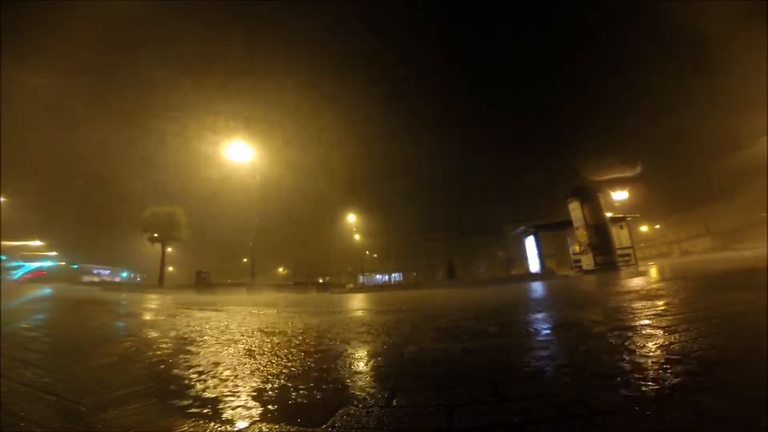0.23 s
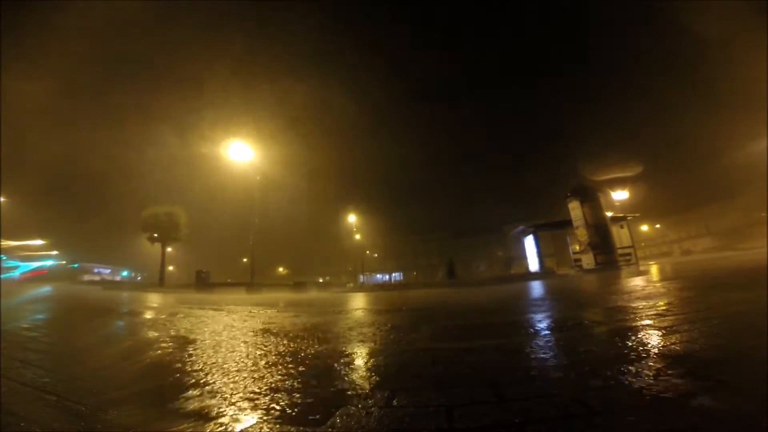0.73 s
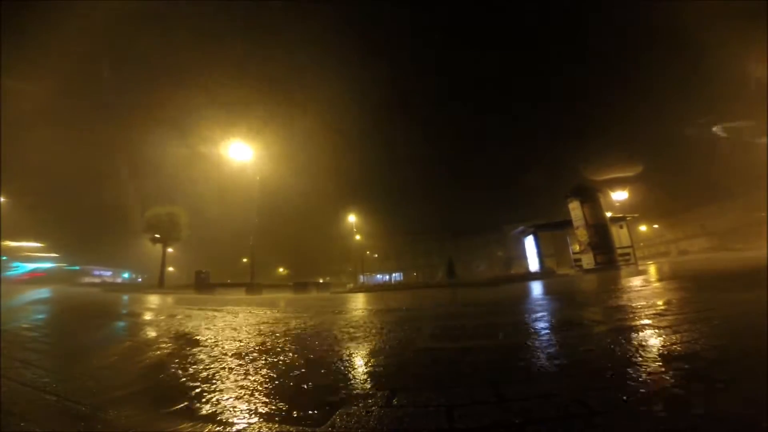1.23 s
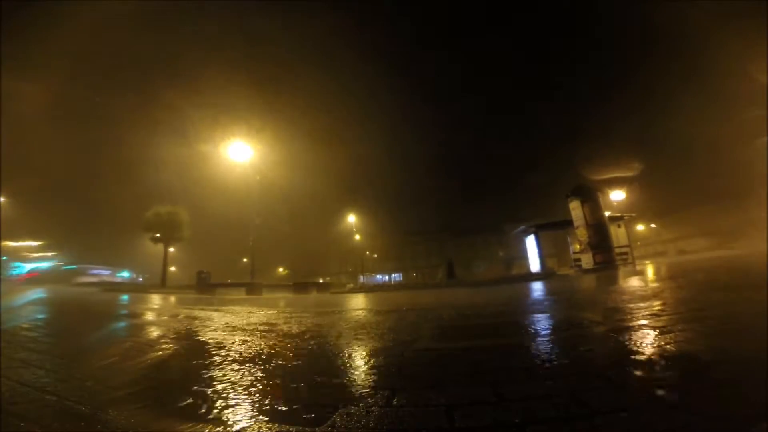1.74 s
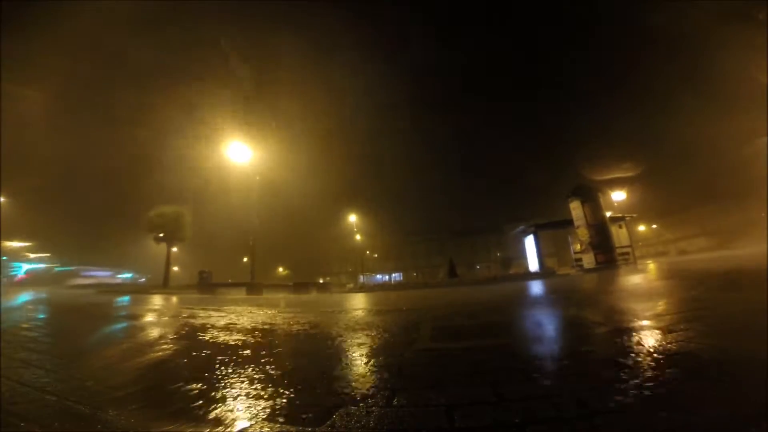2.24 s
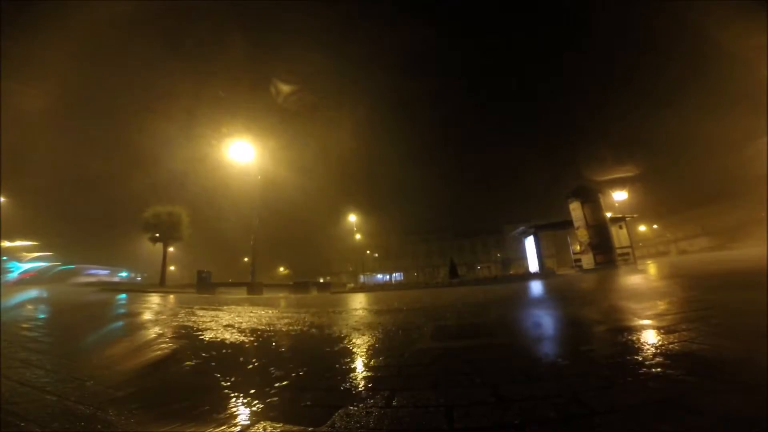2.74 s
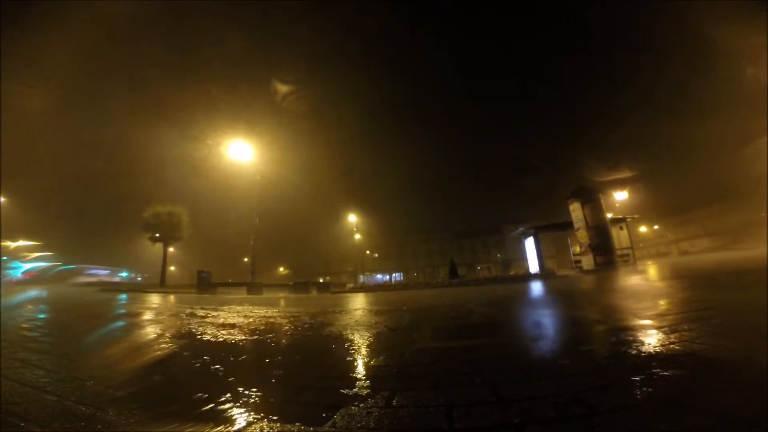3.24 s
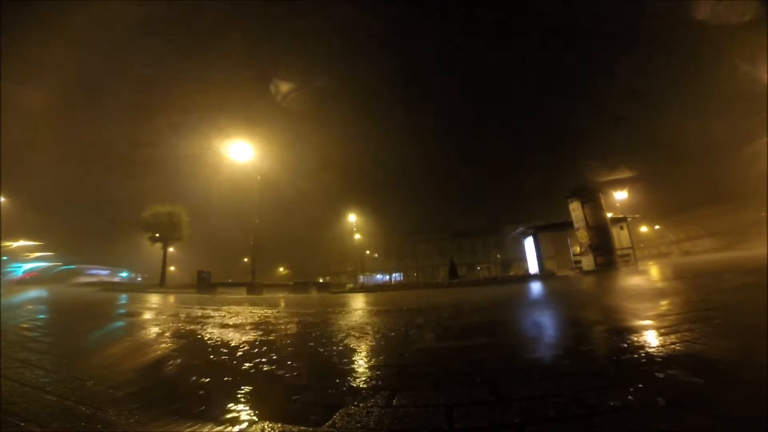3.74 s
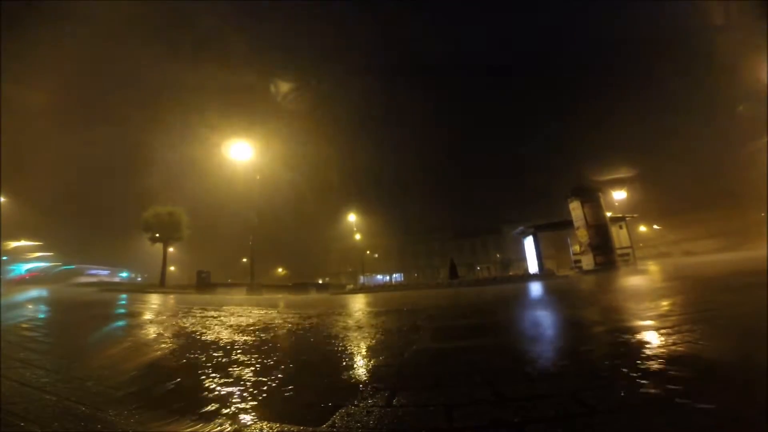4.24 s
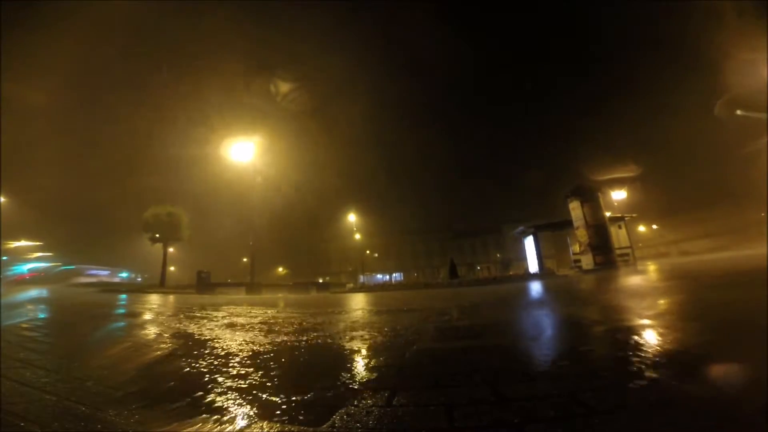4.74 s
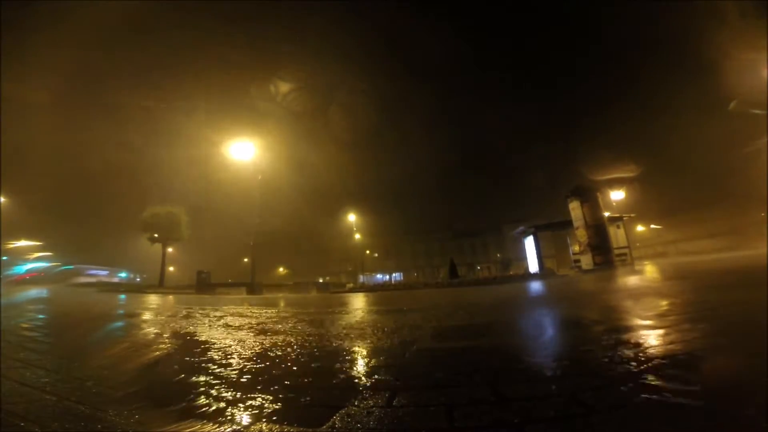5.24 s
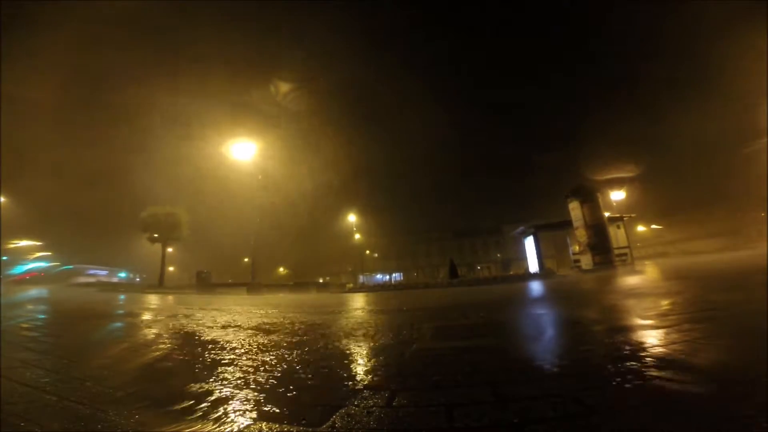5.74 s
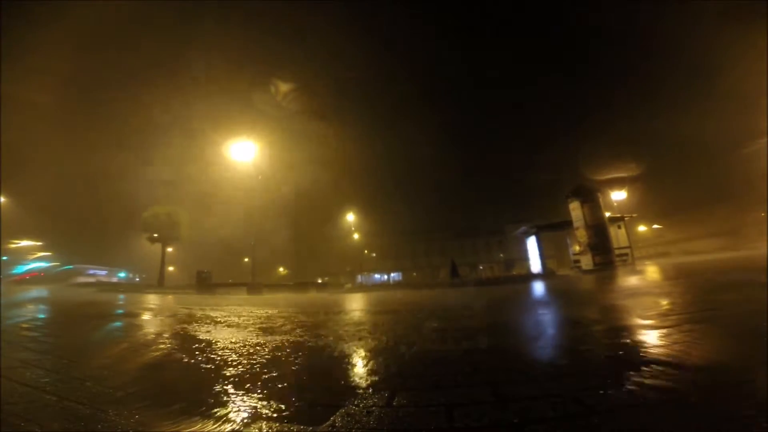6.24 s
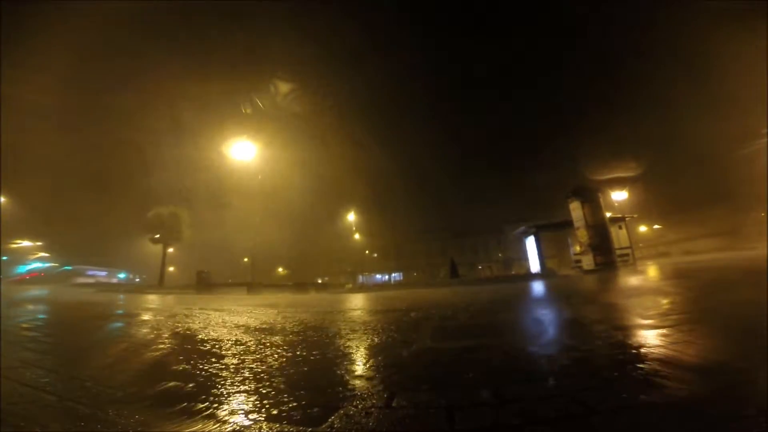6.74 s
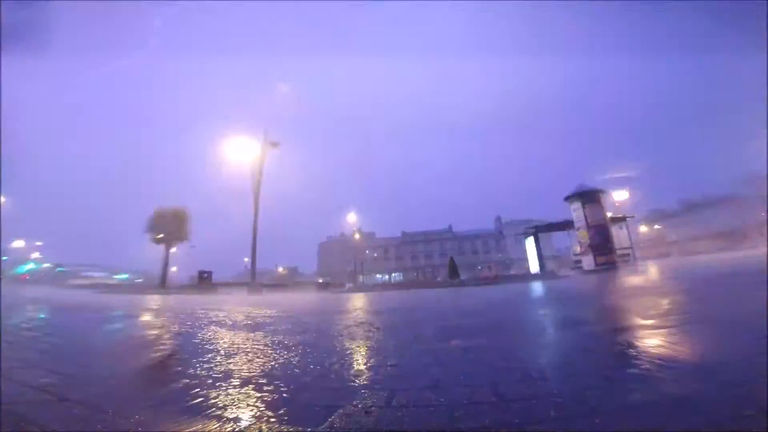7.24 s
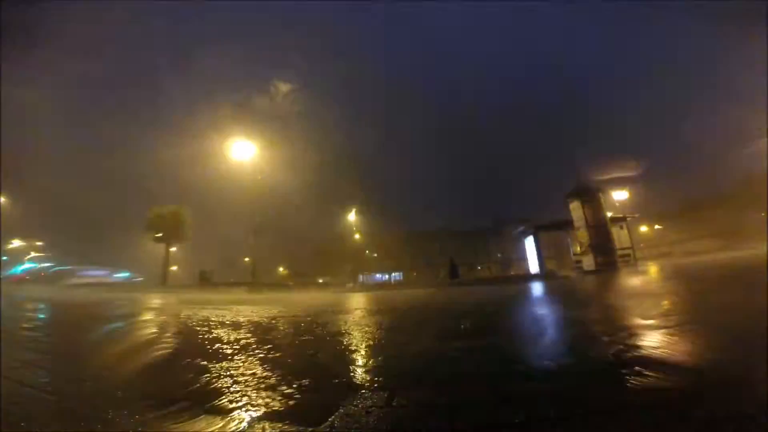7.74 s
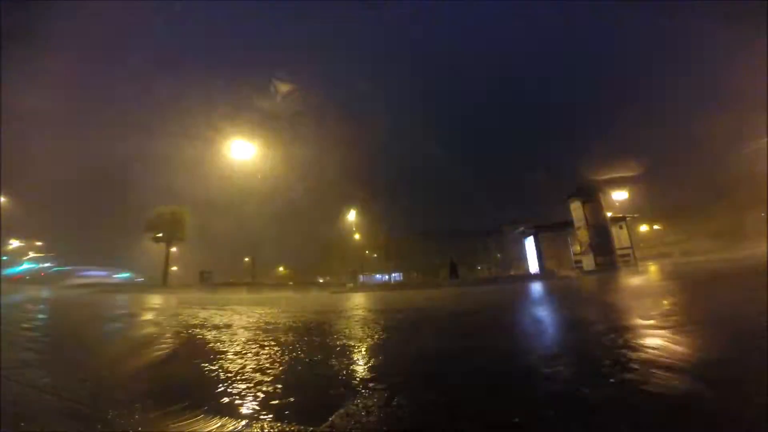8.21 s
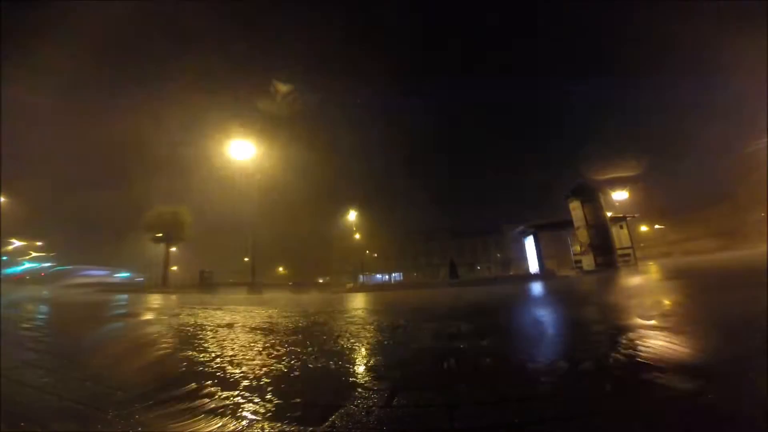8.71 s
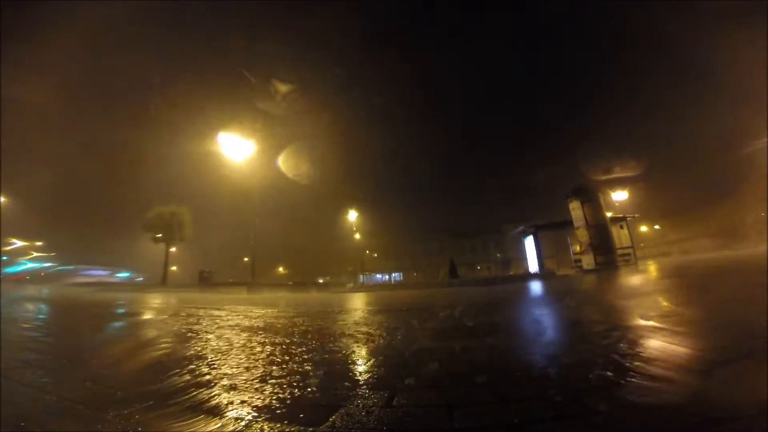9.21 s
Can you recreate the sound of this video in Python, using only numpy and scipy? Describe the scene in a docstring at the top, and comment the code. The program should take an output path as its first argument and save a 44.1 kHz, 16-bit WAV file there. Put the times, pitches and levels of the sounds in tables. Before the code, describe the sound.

Nearby raindrops tap and splash on hard plastic over the hiss of a downpour, with a low roll of far thunder.

```python
"""Night rain on a paved square

Heavy rain, heard from a microphone in a small hard plastic housing near the ground. Close up, gusts
throw drops on the housing, which ticks and rings in a few short modes, and spray fizzes at the opening.
Farther off, rain hisses on the wet paving. Distant thunder rolls below and dies away."""
import sys
import numpy as np
from scipy import signal
from scipy.fft import rfft, irfft, next_fast_len
from scipy.io import wavfile
from scipy.ndimage import uniform_filter1d, map_coordinates

SR = 44100
rng = np.random.default_rng(int(sys.argv[2]) if len(sys.argv) > 2 else 0)


def waveform_to_disk(signal):
    """Save audio, clipped to [-1, 1], as 16-bit WAV at the path in sys.argv[1]."""
    frames = np.transpose(np.atleast_2d(signal))
    scaled = np.clip(frames, -1, 1) * 32767
    samples = np.round(scaled).astype(np.int16)
    wavfile.write(sys.argv[1], SR, samples)


N = 417627


def amp(db):
    """Decibels to gain."""
    return 10 ** (np.asarray(db) / 20)


def unit(x):
    """Scaled to rms 1."""
    return x / np.sqrt(np.mean(x ** 2) + 1e-20)


def curves(rows):
    """One value per sample for each column after the time."""
    times, *columns = np.transpose(rows)
    return [np.interp(np.arange(N) / SR, times, column) for column in columns]


def wobble(per_s):
    """A smooth random curve with per_s knots a second."""
    knots = rng.standard_normal(int(N * per_s / SR) + 4)
    return map_coordinates(knots, [np.arange(N) * per_s / SR])


def filtered(x, response):
    """x through a gain that depends on frequency."""
    size = next_fast_len(N + 8192)
    return irfft(rfft(x, size) * response(np.fft.rfftfreq(size, 1 / SR)), size)[:N]


def coloured(x, spectrum):
    """x through a (f/Hz, level/dB) spectrum on a log frequency axis."""
    f, db = np.transpose(spectrum)
    return filtered(x, lambda hz: amp(np.interp(np.log(hz + 1), np.log(f + 1), db)))


# Rain blown at the microphone: t/s, level/dB
GUST_LEVELS = [(0.0, -50), (0.8, -46), (2.6, -48), (2.7, -55), (3.5, -55.5), (4.25, -58), (4.5, -54),
               (7.2, -53), (7.3, -57), (9.47, -58.5)]
# Sheets of rain flung at the housing, and one lull: t/s, length/s, level/dB over the gust
RAIN_SHEETS = [(0.03, .125, 8), (0.17, .09, -4), (0.28, .17, 4), (0.531, .15, 5), (0.98, .1, 4),
               (1.155, .13, 5), (1.335, .08, 5), (1.68, .07, 4), (1.79, .09, 8), (2.003, .1, 5),
               (2.251, .16, 6), (5.951, .09, 6), (6.28, .12, 4), (7.68, .13, 4), (9.22, .3, 10)]


def gusts(edge_s=0.02, flutter_db=1.5):
    """Strength of the blown rain in dB: slow gusts, sudden sheets on top and a slight flutter."""
    t = np.arange(N) / SR
    sheets_db = sum(np.interp(t, [s - edge_s, s, s + length, s + length + edge_s], [0, db, db, 0])
                    for s, length, db in RAIN_SHEETS)
    return curves(GUST_LEVELS)[0] + sheets_db + flutter_db * wobble(per_s=12)


# Rain out on the square, heard through the housing: f/Hz, relative level/dB
PAVING_SPECTRUM = [(180, -7), (300, 1), (495, -4), (1110, -7.5), (1620, -1.5), (2510, 0.5), (3390, -12.5),
                   (5590, -9.5), (6720, -15.5), (12900, -23.5), (14700, -23.5), (16300, -61)]


def paving_hiss(gust_db):
    """Far drops on wet paving merge into a patchy hiss that follows the gusts a little."""
    spectra = signal.stft(rng.standard_normal(N), nperseg=512)[2]
    patches = uniform_filter1d(rng.standard_normal(spectra.shape), size=6, axis=0)  # across frequency
    patches = uniform_filter1d(patches, size=10, axis=1)  # across time
    noise = signal.istft(spectra * amp(1.6 * unit(patches)), nperseg=512)[1][:N]
    level_db = -53.5 + 0.22 * (gust_db - gust_db.mean())
    return amp(level_db) * unit(coloured(noise, PAVING_SPECTRUM))


# Far thunder as it reaches the square: t/s, deep roll level/dB, growl level/dB
THUNDER_LEVELS = [(0.0, -47, -43.5), (0.26, -45, -39.5), (0.81, -52, -43.5), (0.95, -40, -37.5),
                  (1.12, -45, -35), (1.2, -50, -38), (1.5, -55, -41.5), (2.0, -28.5, -46.5),
                  (2.4, -46.5, -50.5), (2.77, -45.5, -54), (4.22, -67.5, -56.5), (4.4, -48.5, -58.5),
                  (5.09, -62.5, -58), (7.86, -58, -57.5), (8.83, -64.5, -62), (9.47, -51, -60)]
# The deep roll and the growl above it, each: f/Hz, relative level/dB
ROLL_SPECTRUM = [(12, -33), (22, 1.5), (33, -15), (47, 2), (75, -31.5), (160, -120)]
GROWL_SPECTRUM = [(32, -46), (55, -0.5), (162, -2.5), (353, -18), (780, -30), (1320, -120)]


def thunder():
    """Echoes of distant thunder arrive in lumps."""
    roll_db, growl_db = curves(THUNDER_LEVELS)
    roll = amp(0.38 * wobble(per_s=2.5)) * coloured(rng.standard_normal(N), ROLL_SPECTRUM)
    growl = amp(1.9 * wobble(per_s=7.5)) * coloured(rng.standard_normal(N), GROWL_SPECTRUM)
    return amp(roll_db) * unit(roll) + amp(growl_db) * unit(growl)


def ringing(blows, hz, t60):
    """A damped mode; the drop spreads as it lands, so the ring builds up over a cycle or two."""
    turn = np.exp(2j * np.pi * hz / SR)
    decay, onset = amp(-60 / (t60 * SR)), np.exp(-hz / (1.1 * SR))
    return signal.lfilter([1 - onset], np.poly([decay * turn, onset * turn]), blows).imag


def dying_away(blows, t60):
    """An envelope that jumps at each blow and falls 60 dB in t60 seconds."""
    return signal.lfilter([1], [1, -amp(-60 / (t60 * SR))], blows)


# Modes of the plastic, a list per part (low panel, near wall, lid, middle, rim): f/Hz, level/dB, t60/s
HOUSING_MODES = [
    [(625, -7, 0.045)],
    [(1633, 4.5, 0.017), (1468, 9, 0.0033)],
    [(1886, -0.5, 0.03)],
    [(2273, -0.5, 0.0099), (2590, -3.5, 0.012), (2832, -5, 0.011), (315, -16, 0.018), (864, -7.5, 0.0025)],
    [(3820, -12.5, 0.0074), (4830, -1, 0.005), (5635, -6.5, 0.0085), (7190, -16, 0.011)],
]
# Water splashing right by the microphone: f/Hz, relative level/dB
SPLASH_SPECTRUM = [(800, -22), (2500, 6), (5000, -1), (8000, -8.5), (11000, -12.5), (13000, -10),
                   (15000, -37), (16500, -49)]


def struck_housing(times, part_db, scatter_db, splash_t60):
    """Drops ring the housing and splash; part_db has a column per part, then one for the splash."""
    at = np.minimum(np.round(times * SR).astype(int), N - 1)
    modes = [(part, *mode) for part, own in enumerate(HOUSING_MODES) for mode in own]
    # Each landing spot favours other modes; neighbouring modes mostly start opposite ways.
    spot_db = scatter_db * rng.uniform(-1, 1, (len(times), len(modes) + 1))
    pitch_rank = np.argsort(np.argsort([mode[1] for mode in modes] + [SR]))
    polarity = (-1) ** pitch_rank * np.sign(rng.standard_normal(spot_db.shape) + 0.8)
    rings = np.zeros(N)
    for k, (part, hz, db, t60) in enumerate(modes):
        force = polarity[:, k] * amp(part_db[:, part] + db + spot_db[:, k])
        rings += ringing(np.bincount(at, force, N), hz, t60)
    splashes = np.bincount(at, amp(part_db[:, -1] + spot_db[:, -1]), N)
    water = unit(coloured(rng.standard_normal(N), SPLASH_SPECTRUM))
    return rings + dying_away(splashes, splash_t60) * water


def patter(gust_db, count=2200):
    """Small drops, most of them tiny, tick on the housing; a gust brings them thicker and harder."""
    landed = np.cumsum(amp(0.6 * gust_db))
    when, size = rng.random((count, 2)).T
    times = np.interp(when * landed[-1], landed, np.arange(N) / SR)
    size_db = -5.5 * np.log(1 - 0.96 * size)
    part_db = size_db[:, None] + [-24.0, -11.0, -8.5, 0.5, -2.5, -4.0]
    ticks = struck_housing(times, part_db, scatter_db=11.5, splash_t60=0.0086)
    return amp(0.7 * gust_db - 14.0) * unit(ticks)


def spray(gust_db, count=5500):
    """Fine droplets fizz around the microphone opening and grow faster than the patter in a gust."""
    when, size = rng.random((count, 2)).T
    size_db = -5 * np.log(1 - 0.98 * size)
    hits = np.bincount((when * N).astype(int), amp(size_db), N)
    fizz = dying_away(hits, t60=0.0035) * rng.standard_normal(N)
    level_db = 1.336 * gust_db + 1.1 * wobble(per_s=30) + 3
    return amp(level_db) * unit(coloured(fizz, SPLASH_SPECTRUM))


# Heavy drops on the housing: t/s, level/dB, landing angle/deg, rim level/dB over the drop's level
BIG_DROPS = [(0.0563, -31.5, 130, 0.5), (0.0778, -23, 264, -10.5), (0.1338, -34, 145, 3),
             (0.2713, -34.5, 150, 2), (0.2955, -28, 290, -14), (0.3091, -35, 170, -3),
             (0.3999, -19.5, 183, -19), (0.439, -19.5, 190, -32), (0.5111, -17.5, 323, -35),
             (0.5569, -39.5, 110, 7.5), (0.701, -13.5, 253, -7.5), (0.7369, 3.5, 85, -21),
             (0.7775, -23.5, 144, -4.5), (0.9828, -27.5, 200, -2.5), (1.052, -27.5, 196, -3.5),
             (1.1593, -23.5, 140, -5.5), (1.2176, -20, 190, -5), (1.4186, -21.5, 100, -29),
             (1.428, -33.5, 120, 9.5), (1.4583, -28.5, 300, 2.5), (1.521, -17, 324, -13),
             (1.598, -31, 170, 3), (1.769, -39.5, 180, 16), (1.8004, -19, 116, -4),
             (1.847, -34.5, 100, 11.5), (1.9288, -3, 143, -9.5), (2.1615, -40, 120, 9.5),
             (2.286, -33.5, 110, 5), (2.4338, -13.5, 87, -11), (2.4697, -20, 130, -7),
             (2.5114, -20, 256, -2), (2.5903, -12, 72, -8.5), (2.907, -29.5, 120, -11),
             (2.9671, -30, 74, -2), (3.032, -30.5, 160, -3.5), (3.104, -26, 197, 1), (3.21, -34, 170, -10),
             (3.293, -33, 180, -10), (3.407, -33.5, 200, 1), (3.49, -26, 185, -15), (3.922, -35, 20, 3),
             (3.939, -28, 105, -17), (4.0545, -36.5, 47, 6.5), (4.4723, -30, 88, -14),
             (4.5857, -29.5, 380, -6), (4.6269, -37, 310, 2.5), (4.792, -21, 114, -11),
             (4.871, -16, 106, -13), (4.9201, -26, 160, -7.5), (5.017, -27, 190, -11),
             (5.061, -25, 114, -19), (5.1389, -25, 294, -2.5), (5.234, -21.5, 38, -1),
             (5.3675, -23, 190, -15), (5.501, -29.5, 214, -8), (5.5882, -27, 185, -6.5),
             (5.7952, -27.5, 165, -16), (5.844, -33.5, 190, -4), (5.9675, -27.5, 170, -5.5),
             (5.984, -20, 110, -20), (6.0676, -22, 295, -24), (6.3553, -25, 200, -6),
             (6.6024, -36.5, 185, 3), (6.813, -15, 213, -4), (6.9958, -23, 290, -33),
             (7.064, -25, 106, -8.5), (7.101, -23.5, 110, -23), (7.1312, -34.5, 190, 4),
             (7.224, -35, 200, -1.5), (7.543, -32, 160, -19), (7.5813, -24, 135, -13),
             (7.6067, -29, 340, -26), (7.6807, -39.5, 180, 2.5), (7.881, -33, 130, -4.5),
             (7.884, -37, 230, -2.5), (7.8891, -25, 290, -20), (7.8933, -28.5, 220, -20),
             (7.979, -32.5, 164, -2), (8.5158, -32, 240, -30), (8.5195, -35, 220, -30),
             (8.5275, -35, 250, -30), (8.5805, -16.5, 37, -9.5), (9.062, -17.5, 247, -5),
             (9.1195, -35.5, 180, -27), (9.3724, -30.5, 100, -21)]
# Places round the housing (low panel, near wall, lid, middle, microphone opening):
# angle/deg, level/dB when hit there, loss/dB a quarter turn away
HOUSING_LAYOUT = [(0, -8.5, 10.5), (261, -5, 12.5), (78, -3.5, 8), (189, 0, 9.5), (200, 2, 2)]


def big_drops():
    """Single heavy drops land right by the microphone; the parts nearest the landing spot ring most."""
    times, drop_db, landing_deg, rim_db = np.transpose(BIG_DROPS)
    part_deg, direct_db, loss_db = np.transpose(HOUSING_LAYOUT)
    reach_db = direct_db - loss_db * (1 - np.cos(np.radians(landing_deg[:, None] - part_deg)))
    splash_db = reach_db[:, -1] + rim_db  # the splash is as crisp as the rim tick
    part_db = drop_db[:, None] + np.column_stack([reach_db[:, :-1], rim_db, splash_db])
    return struck_housing(times, part_db, scatter_db=3.2, splash_t60=0.0085)


def scene():
    """All sources at one low microphone; the same gusts drive the near and far rain."""
    gust_db = gusts()
    near_rain = big_drops() + patter(gust_db) + spray(gust_db)
    return (near_rain + paving_hiss(gust_db) + thunder())[None]


def record(dry, ceiling=0.99, top_hz=16500):
    """The microphone's input stage rounds off the loudest drops; nothing passes above top_hz."""
    rounded = dry[0] / (1 + np.abs(dry[0] / ceiling) ** 8) ** (1 / 8)
    return filtered(rounded, lambda hz: hz < top_hz)[None]


dry = scene()
out = record(dry)
waveform_to_disk(out)
```